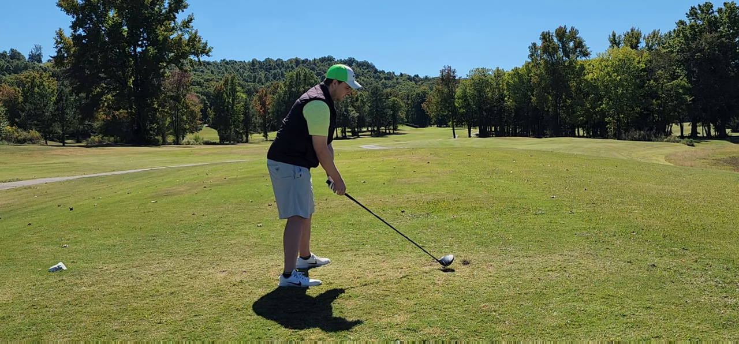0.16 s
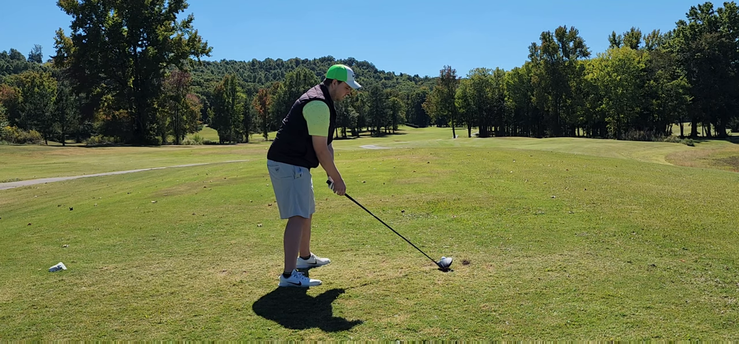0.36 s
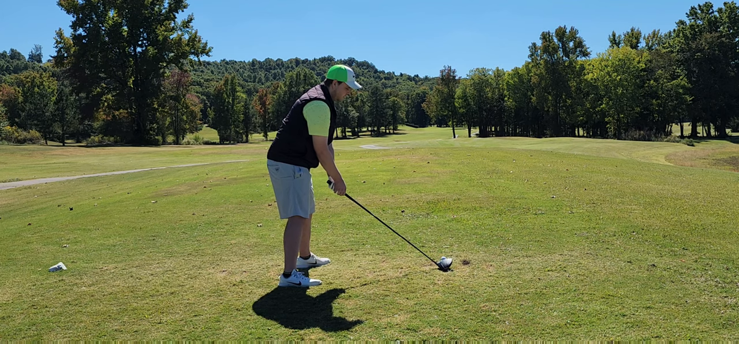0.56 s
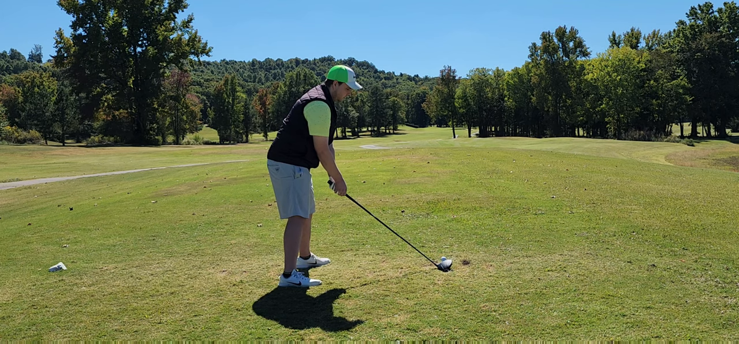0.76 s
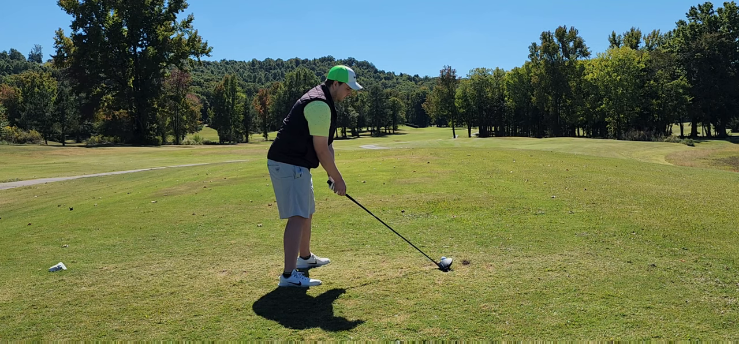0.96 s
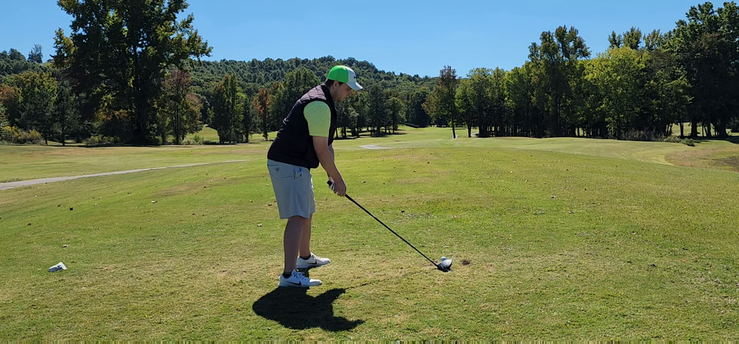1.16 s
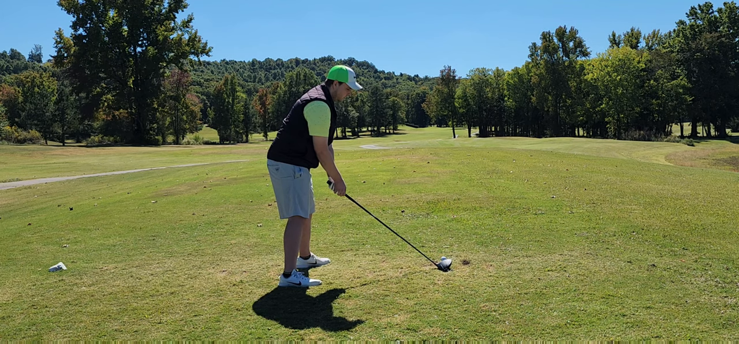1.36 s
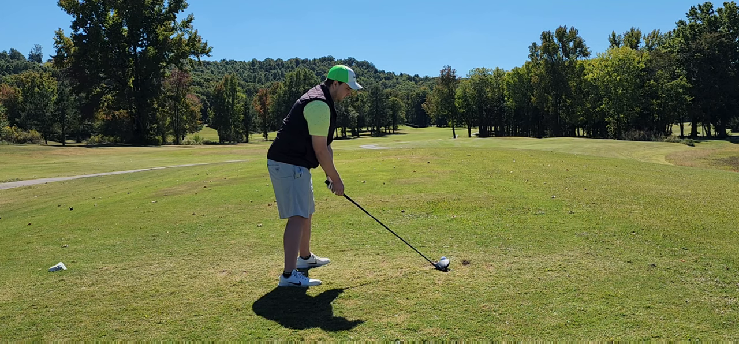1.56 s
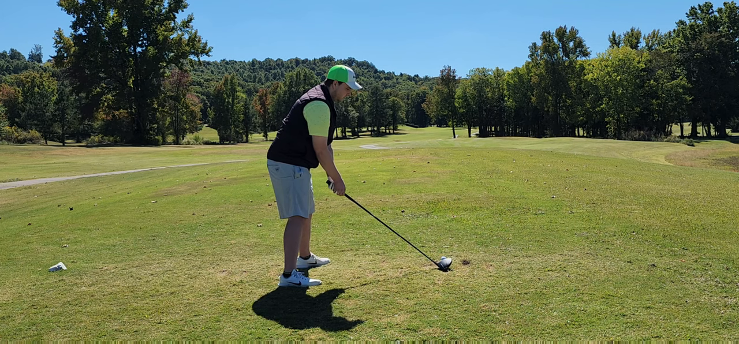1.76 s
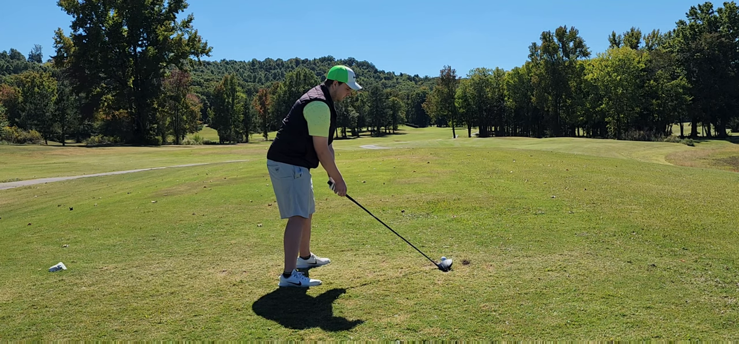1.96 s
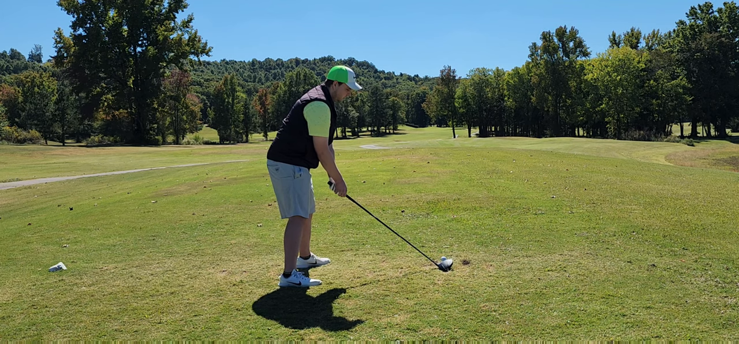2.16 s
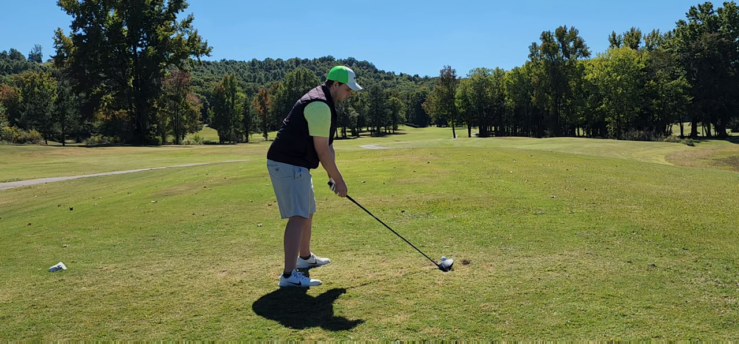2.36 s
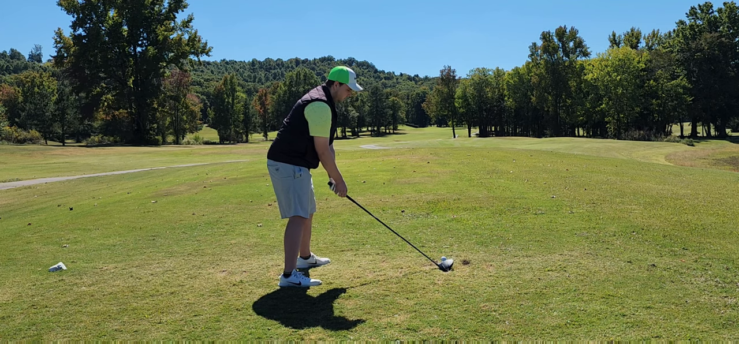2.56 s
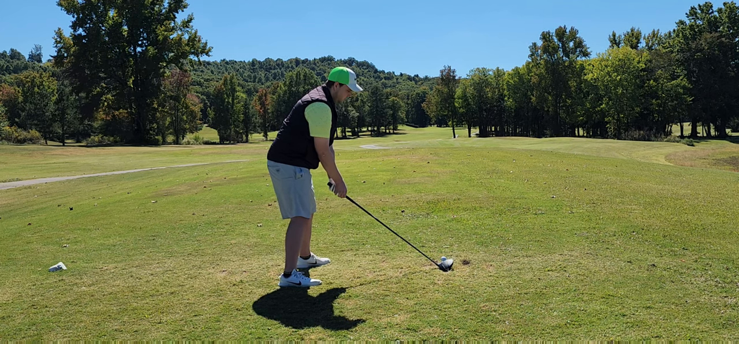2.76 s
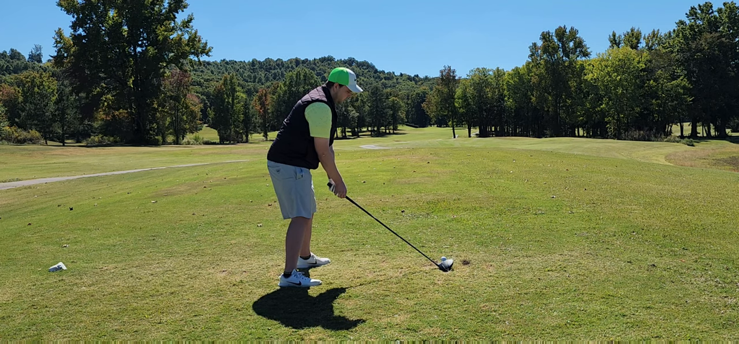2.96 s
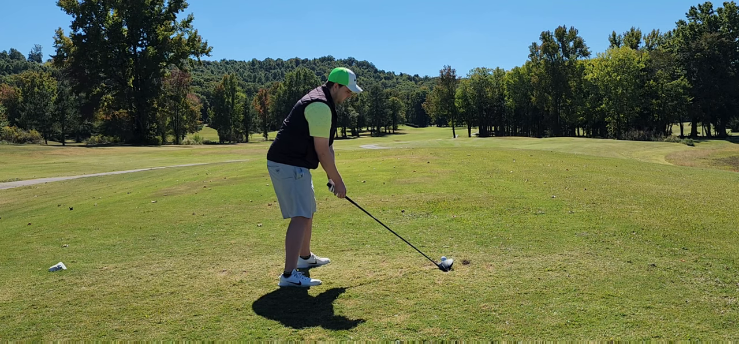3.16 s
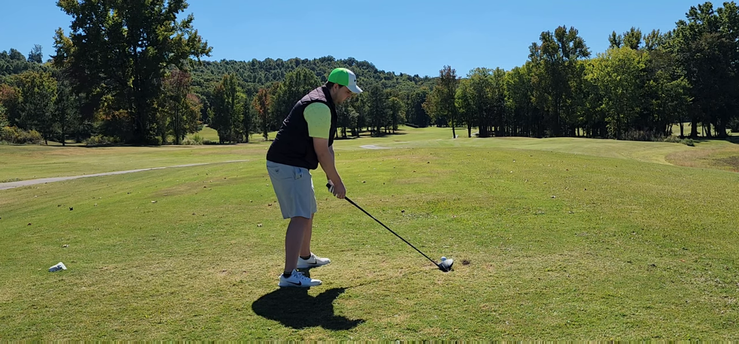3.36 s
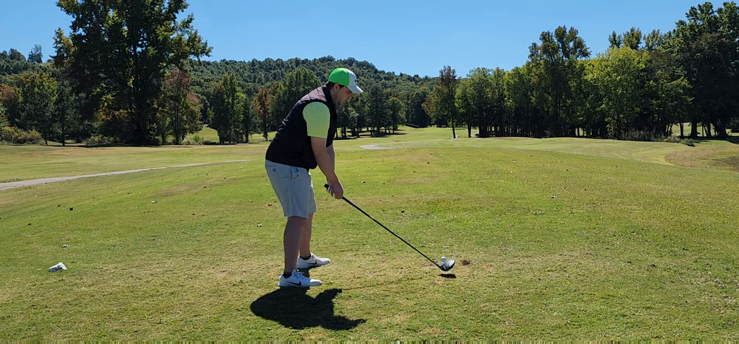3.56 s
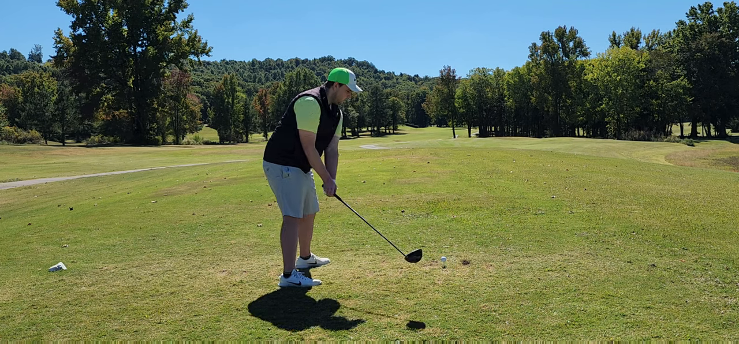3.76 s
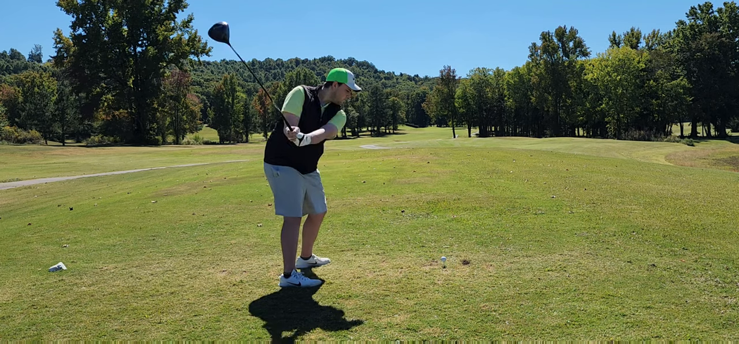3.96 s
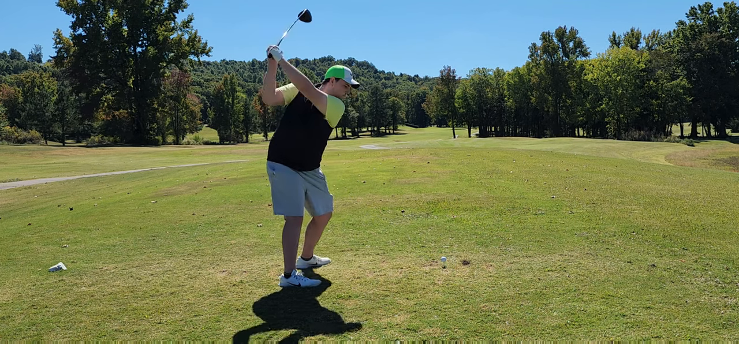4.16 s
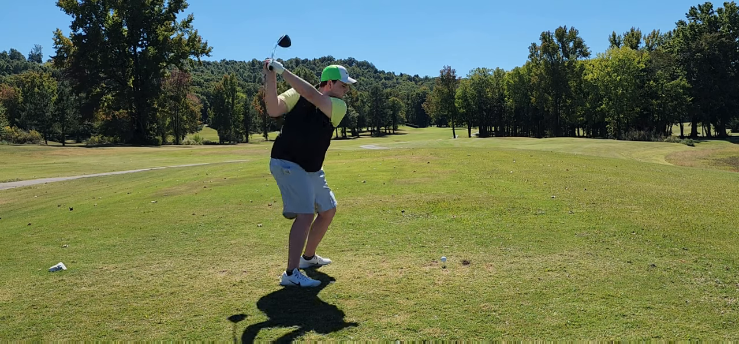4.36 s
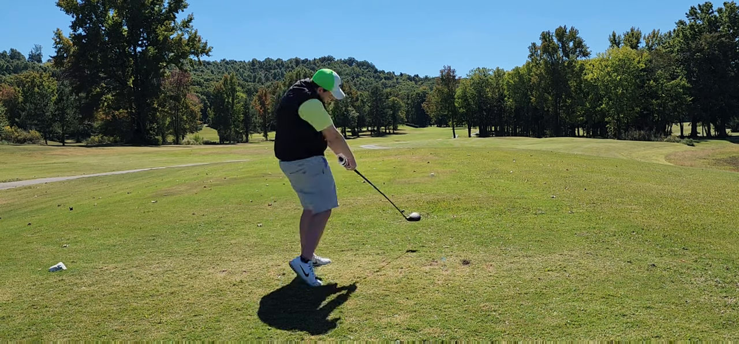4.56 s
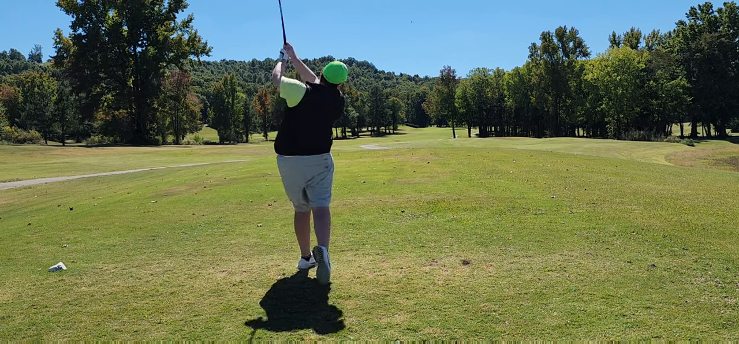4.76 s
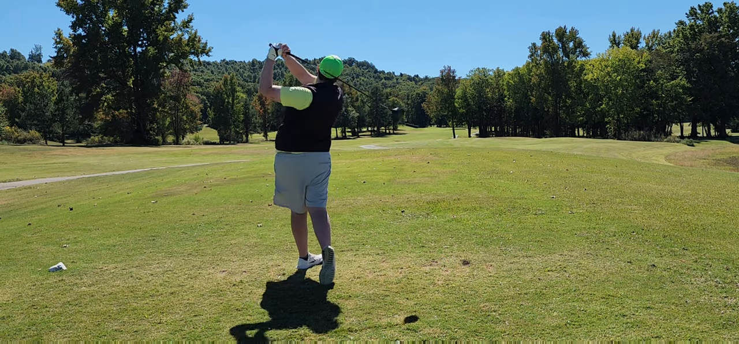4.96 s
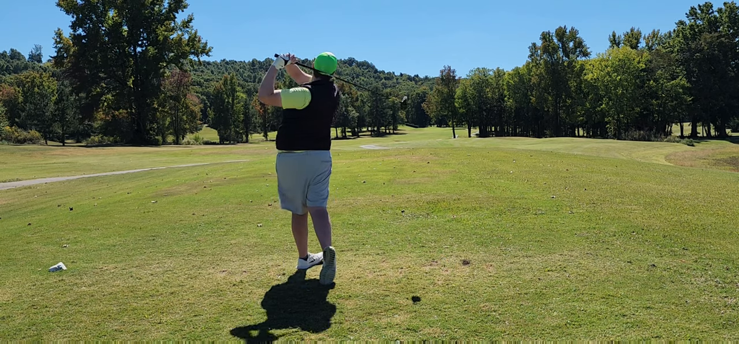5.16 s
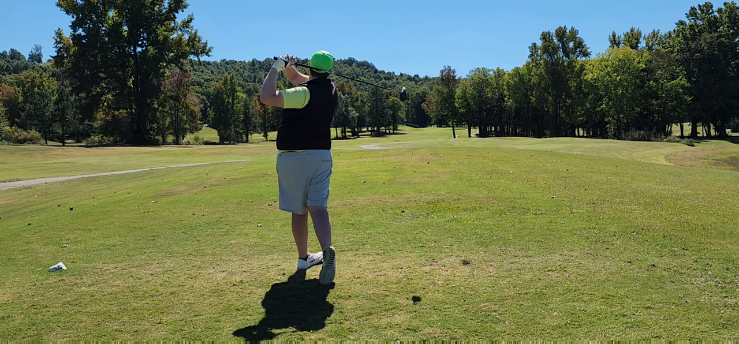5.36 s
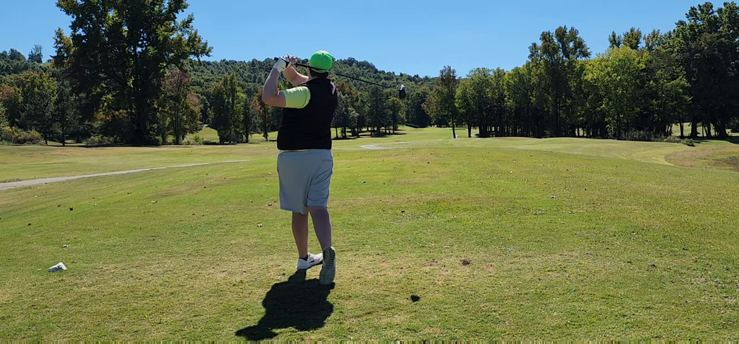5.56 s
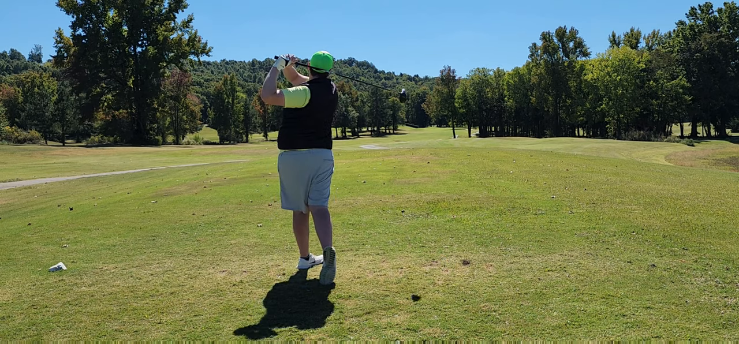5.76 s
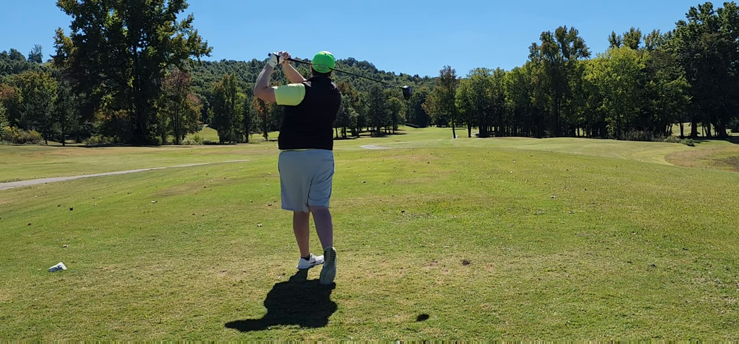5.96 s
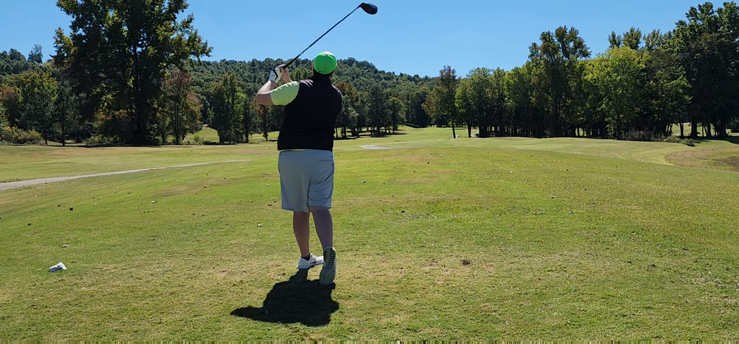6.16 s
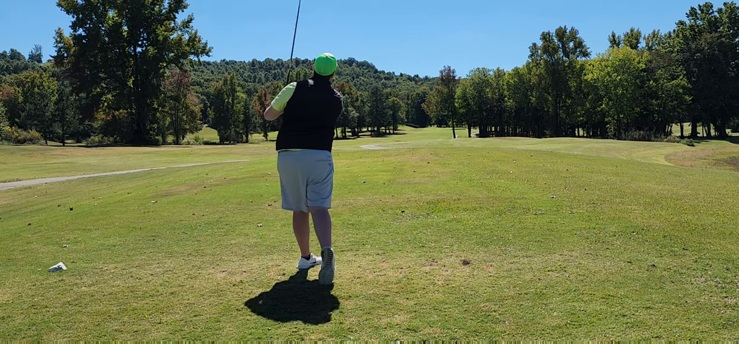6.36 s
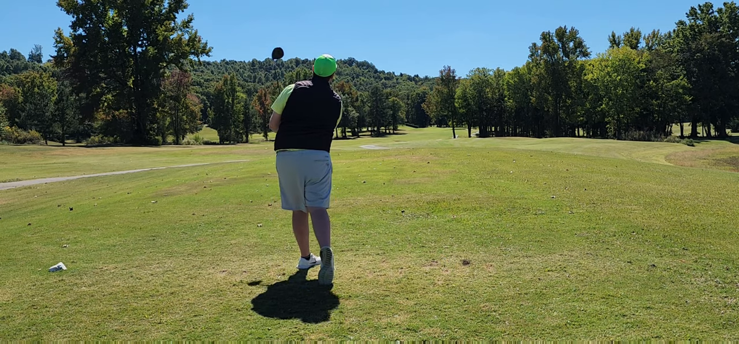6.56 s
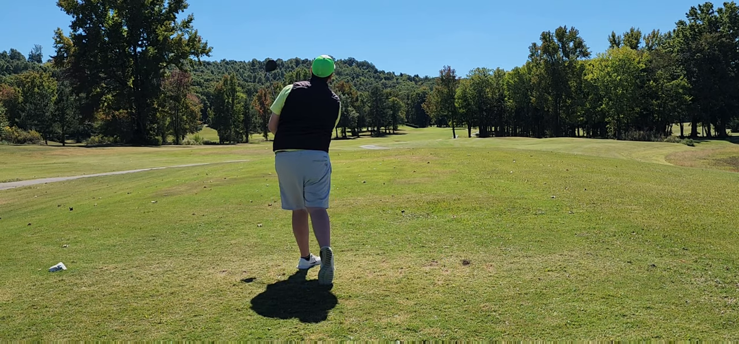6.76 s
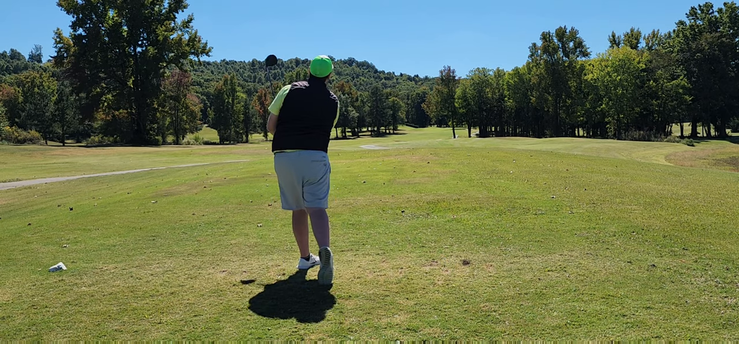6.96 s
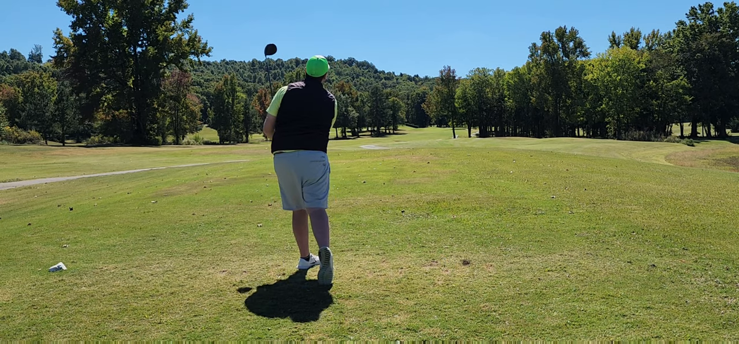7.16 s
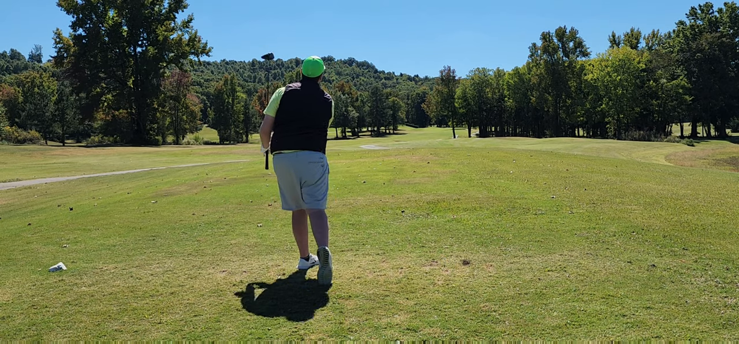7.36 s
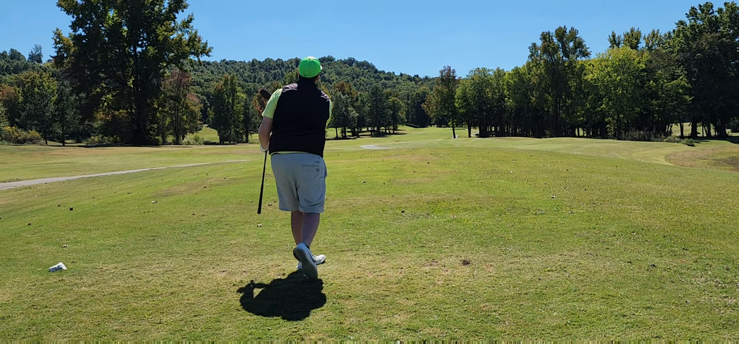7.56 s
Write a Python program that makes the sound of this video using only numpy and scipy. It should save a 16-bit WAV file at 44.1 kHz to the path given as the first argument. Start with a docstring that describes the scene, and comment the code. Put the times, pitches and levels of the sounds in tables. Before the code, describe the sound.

Wind softly buffets a stereo microphone a few metres from a golfer, while two far engines drone and leaves hiss gently. A few tiny scuffs pass unnoticed. Then comes a brief rising whoosh, a sharp metallic crack far louder than everything else, and a quick high ring gliding slightly upward. A leafy splash of echo follows at once, then weak smeared returns from far trees, and the calm hum continues, slightly lowered at first.

```python
"""A golfer drives a ball off the tee, a few metres from a microphone, on an open course.
From the start, sine tones make two distant mowers; filtered noise makes low wind, leaves and crickets.
Faint scuffs of noise come and go before and after the hit. At 4.4 s the shaft whistles: a gliding sine
with noise around it. The hollow metal head cracks and rings, as short bursts and fading sines that
glide up. Near trees splash the crack back as noise; far trees return the ring, smeared and repitched."""
import sys
import numpy as np
from scipy import signal
from scipy.fft import rfft, irfft
from scipy.io import wavfile
from scipy.ndimage import uniform_filter1d

SR = 44100
rng = np.random.default_rng(int(sys.argv[2]) if len(sys.argv) > 2 else 0)


def transcribe(signal):
    """Save signal, clipped to [-1, 1], as a 16-bit WAV file at the path in sys.argv[1]."""
    frames = np.atleast_2d(signal).T
    limited = np.clip(frames, -1, 1)
    pcm = np.round(limited * 32767).astype(np.int16)
    wavfile.write(sys.argv[1], SR, pcm)


N = 336042
TIME = np.arange(N) / SR  # seconds
IMPACT_S = 4.574
EDGE_HZ = 15600  # highest frequency let through

# Steady firing rates of the two far engines [f/Hz]
FIRING_HZ = (68.3, 48.5)
ENGINE_DB, ENGINE_DRIFT_HZ = -41, 0.12
# Engine tones [engine 0 or 1, multiple of the firing rate, level/dB relative to ENGINE_DB]
ENGINE_TONES = [(0, 1, 0), (0, 2, -8), (0, 2.6, -21), (0, 3, -26), (0, 3.33, -28), (0, 5, -41), (0, 8, -38),
                (0, 8.75, -36), (0, 9, -37), (0, 9.5, -39), (0, 10, -26), (0, 10.25, -34), (0, 10.5, -38),
                (0, 16.75, -38), (0, 29.75, -38), (0, 30.25, -38), (1, 1, -10), (1, 2, -4.5), (1, 2.7, -16)]
# Brief dips of the engines' bass hum [t/s, half length/s, level change/dB]
HUM_DIPS = [(3.5, 0.59, -1), (4.3, 0.16, -4.5), (4.67, 0.1, -20), (4.92, 0.068, -21)]
BLADE_HZ, BLADE_DB = 450, -78  # level between the swells
# The blades hum louder as the mower turns this way [t/s, half length/s, rise/dB]
BLADE_SWELLS = [(.6, 0.75, 8.5), (3.45, 0.47, 13), (4.05, 0.25, 7), (6.3, 1, 12.5), (7.2, 0.22, 8.5)]
RECEDE_DB_PER_S = 0.14  # a mower slowly moves away

# Colour of the wind on the microphone [f/Hz, level/dB per Hz]
WIND_COLOUR = [(10, -25), (25, -8.5), (45, 0.5), (80, 0.5), (115, -4.5), (150, -6), (185, -13.5),
               (230, -25.5), (300, -41), (500, -57.5), (2000, -89.5)]
BREEZE_DB = -45.5  # level between gusts
# Gusts over the steady breeze [t/s, half length/s, rise/dB]
WIND_GUSTS = [(1.85, 0.27, 4.1), (2.37, 0.26, 7.9), (2.56, 0.078, 6.4), (2.72, 0.039, 8.1),
              (2.969, 0.08, 5.6), (3.3, .15, 4.7), (4.07, 0.11, 4.3), (4.88, 0.069, 4.1), (7.3, 0.4, 3.5)]
# Gusts also buffet higher up, growing faster than the rumble (dB per dB)
BUFFET_DB, BUFFET_GROWTH = -79.5, 2.0

# Colours of the mower deck's drone, the leaves and the high hiss [f/Hz, level/dB per Hz]
DRONE_COLOUR = [(150, -30), (300, -11.5), (450, -8), (500, -7.5), (580, -2.5), (700, -2.5), (880, -4.5),
                (1000, -5), (1140, 0), (1260, -9.5), (1500, -13.5), (4000, -60)]
RUSTLE_COLOUR = [(400, -29), (950, -5.5), (1350, 0.5), (1650, -2), (2100, -3), (2800, -11.5), (4000, -22),
                 (9000, -53.5)]
HISS_COLOUR = [(800, -22), (2800, 0.5), (4600, -1), (6400, -5.5), (8300, -8.5), (10000, -23), (13000, -23),
               (16000, -24)]
DRONE_DB, RUSTLE_DB, HISS_DB = -60, -63, -67.5  # base levels
# Slow change in the drone's level [t/s, half length/s, level change/dB]
DRONE_CHANGES = [(1.5, .9, -0.5)]
# Breaths of wind swell in the leaves [t/s, half length/s, rise/dB]
LEAF_SWELLS = [(3.0, 0.61, 5), (3.95, 0.41, 3.4), (7.6, 0.75, 3.1)]
HISS_SHARE = 0.29  # part of each leaf swell, in dB, that the hiss follows
FLUTTER_DB = 1.8  # size of the patchy flicker
# Crickets [f/Hz, level/dB before wavering]
CRICKETS = [(4800, -88), (6270, -88.5)]

# Faint scuffs of shoes, clothes and grass [t/s, half length/s, centre f/Hz, level/dB]
SCUFFS = [(2.053, 0.021, 4340, -68), (2.623, 0.0018, 1750, -52.5), (3.985, 0.0018, 9400, -65),
          (4.063, 0.19, 10110, -83), (4.5712, 0.00076, 451, -36.5), (4.617, 0.0035, 482, -52),
          (6.88, 0.021, 7250, -83), (7.52, .15, 10500, -85)]

# Downswing [t/s, shaft whistle f/Hz, whoosh level/dB, head hiss level/dB]
SWING = [(4.41, 450, -68, -82), (4.455, 520, -58, -64), (4.475, 600, -52, -58.5),
         (4.488, 630, -49.5, -56.5), (4.501, 750, -36.5, -53.5), (4.513, 740, -41, -52.5),
         (4.525, 820, -40, -51.5), (4.552, 870, -40.5, -45), (4.567, 830, -44.5, -32.5),
         (4.582, 800, -67, -45), (4.63, 600, -80, -80)]
# Colours of the shaft's wake and of the head's hiss [f/Hz, level/dB per Hz]
WAKE_COLOUR = [(100, -4.5), (300, -3.5), (600, 5.0), (1100, -4.0), (1800, -18), (3600, -28), (9000, -55)]
HEAD_HISS_COLOUR = [(1000, -9.5), (2000, -1), (3200, 0), (5500, 3.5), (8000, 1.5), (10000, -7.5),
                    (15500, -5.0)]
# The upper whistles grow faster than the main one as the shaft speeds up
BRIGHTEN_DB_PER_HZ, BRIGHT_FROM_HZ = 0.05, 810
# Low puff of air pushed ahead of the head [t/s, half length/s, level/dB]
PUFF = (4.563, .011, -40.5)

# Crack of face and ball [f/Hz, peak level/dB, time to peak/s]
CRACK = [(1790, -20, 0.00025), (2530, -15.5, .00035), (3670, -14.5, 0.00065), (5282, -4, 0.00063),
         (7330, -15.5, 0.0019), (8400, -17.5, 0.0006), (13950, -20, 0.00063)]
# Ring of the club head [f/Hz at contact, relative level/dB, time to fall 60 dB/s, time to swell/s]
HEAD_MODES = [(1735, -52, .3, .04), (1873, -37, .19, .045), (2169, -43, .12, .012), (2800, -55, .25, .02),
              (3350, -40, .15, .002), (3413, -27.5, .175, .008), (3795, -20, .04, .001),
              (3870, -24.5, .095, .01), (3985, -20.5, .05, .001), (4115, -39, .15, .002),
              (4279, -30, .07, .002), (4581, -35, .11, .002), (4726, -38, .2, .002), (4830, -26, .05, .001),
              (5125, -21.5, .04, .001), (5278, -21.5, .125, .002), (5340, -33, .16, .002),
              (5427, -20, .055, .002), (5508, -28, .12, .002), (5552, -31, .11, .002),
              (5890, -11, .018, .0005), (5950, -38, .13, .004), (6015, -22, .095, .016),
              (6360, -35, .08, .002), (6650, -37, .07, .002), (6952, -27, .055, .002),
              (7160, -37, .11, .002), (7238, -37, .09, .002), (7380, -38, .12, .002),
              (7605, -31, .05, .002), (7760, -35, .06, .002), (7881, -39, .09, .002)]
# The shell's crowd of weak, short modes [f/Hz, level/dB per Hz]
SHELL_COLOUR = [(300, -35), (1500, -28), (3100, -14.5), (3800, -2.5), (4500, -8), (5500, -1), (6500, -9.5),
                (8300, -3), (10200, -12), (12200, -16.5), (13200, -13.5), (15500, -15)]
# Two near reflections of the hit [delay/s, level/dB]
REFLECTIONS = [(0.00663, -14), (0.0081, -23)]

# Colour of the near trees' splash [f/Hz, level/dB per Hz]
SPLASH_COLOUR = [(500, -26), (1500, -20), (2900, -9), (3500, -18), (3900, -3), (4700, -9), (6000, -1),
                 (6700, -0.5), (7400, -15), (8400, -7), (10000, -15), (15500, -21)]
# Near trees [delay/s, rise/s, time to fall 60 dB/s, level/dB, left over right level/dB]
NEAR_TREES = [(.08, 0.018, 0.24, -41, 4.5), (.104, 0.014, 0.15, -44, 1)]
# Far stands of trees [delay/s, rise/s, time to fall 60 dB/s, level/dB, pitch ratio,
#                      lowest f/Hz, highest f/Hz, left over right level/dB]
FAR_TREES = [(.375, 0.049, 0.46, -59.5, 1.155, 3900, 6200, -.5),
             (.485, .015, 0.13, -60, 1.1, 5400, 6400, -.5), (.497, .01, 0.13, -56, 1.0, 3600, 5500, 1),
             (.68, .03, .4, -68.5, 1.06, 5200, 6300, 2), (.755, .02, .2, -65, 0.73, 4870, 5600, 1)]

# Gain control: threshold, share of the excess taken off, time to turn down, recovery
AGC_THRESHOLD_DB, AGC_SHARE, AGC_ATTACK_S, AGC_RECOVERY_DB_PER_S = -25, 0.43, 0.36, 0.66


def gain_of(db):
    """Turns decibels into amplitude."""
    return 10 ** (np.asarray(db) / 20)


def evened(x):
    """Scales a sound to an rms (average strength) of 1."""
    return x / np.sqrt(np.mean(x ** 2) + 1e-20)


def curves(rows):
    """Draws each column of a timed table as a curve with a value at every sample."""
    times, *columns = np.transpose(rows)
    return [np.interp(TIME, times, column) for column in columns]


def swells(rows):
    """Adds up smooth rises and falls of level, in dB at every sample."""
    return sum(db * np.exp(-((TIME - s) / length) ** 2) for s, length, db in rows)


def wander(rate_hz):
    """Makes a smooth random curve of rms 1; a higher rate wanders faster."""
    hz = np.fft.rfftfreq(N, 1 / SR)
    return evened(irfft(rfft(rng.standard_normal(N)) * np.exp(-(hz / rate_hz) ** 2), N))


def noise(colour, same, left_lag_s=0):
    """Makes coloured stereo noise, partly shared by two microphone ports; the left may lag."""
    hz = np.fft.rfftfreq(N, 1 / SR)
    f, db = np.transpose(colour)
    shared = rfft(rng.standard_normal(N))
    own = rfft(rng.standard_normal((2, N)))
    shared = np.array([shared * np.exp(-2j * np.pi * hz * left_lag_s), shared])
    same = np.clip(same, 0, 1)
    mixed = np.sqrt(same) * shared + np.sqrt(1 - same) * own
    shape = gain_of(np.interp(np.log(hz + 1), np.log(f), db))
    return evened(irfft(mixed * shape, N))


def band(x, low_hz, high_hz):
    """Keeps the range between two frequencies, at rms 1."""
    edges = [low_hz, min(high_hz, EDGE_HZ)]
    return evened(signal.sosfilt(signal.butter(3, edges, "band", fs=SR, output="sos"), x))


def resonate(x, hz, width):
    """Lets through a narrow range that follows the curve hz, with gain 1 at its centre."""
    turn = np.exp(2j * np.pi * np.cumsum(hz) / SR)
    r = np.exp(-np.pi * width / SR)
    return 2 * (turn * signal.lfilter([1 - r], [1, -r], x / turn)).real


def resonant_noise(first_hz, second_hz, width):
    """Passes noise through two moving resonances in a row, at rms 1."""
    return evened(resonate(resonate(rng.standard_normal(N), first_hz, width), second_hz, width))


def pan(db):
    """Gives the gains of left and right for a level difference."""
    return gain_of([[db / 2], [-db / 2]])


def flutter(x):
    """Makes the level flicker at random in small patches of time and frequency."""
    z = signal.stft(x, nperseg=512, noverlap=384)[2]
    patches = rng.standard_normal(z.shape[1:])
    patches = uniform_filter1d(patches, size=5, axis=0)
    patches = evened(uniform_filter1d(patches, size=12, axis=1))
    flickering = z * gain_of(FLUTTER_DB * patches)
    return evened(signal.istft(flickering, nperseg=512, noverlap=384)[1][:, :N])


def mower():
    """Engine firing and spinning blades give wavering sine tones that reach the left port first."""
    port_lag_s = np.array([[0], [19]]) / SR
    turns = [np.cumsum(hz + ENGINE_DRIFT_HZ * wander(0.6)) / SR - hz * port_lag_s for hz in FIRING_HZ]
    dip_db, tones = swells(HUM_DIPS), 0
    for engine, multiple, db in ENGINE_TONES:
        drift = 0.014 * min(multiple, 8) * wander(12) + rng.random()  # in cycles
        bass = multiple * FIRING_HZ[engine] < 300
        change_db = dip_db if bass else 0.5 - RECEDE_DB_PER_S * TIME
        level = gain_of(db + change_db + wander(4.6))
        tones += level * np.sin(2 * np.pi * (multiple * turns[engine] + drift))
    blade_level = gain_of(BLADE_DB + swells(BLADE_SWELLS) + 2 * wander(8))
    blade_cycles = BLADE_HZ * (TIME - port_lag_s) + 0.22 * wander(14)
    blades = blade_level * np.sin(2 * np.pi * blade_cycles)
    return np.sqrt(2) * gain_of(ENGINE_DB) * tones * pan(-0.52) + blades


def wind():
    """Moving air rumbles unevenly at the two ports; gusts make it louder and brighter."""
    gust_db = swells(WIND_GUSTS) + wander(9.5)
    rumble = gain_of(BREEZE_DB + gust_db) * noise(WIND_COLOUR, 0.76)
    buffet_level = gain_of(BUFFET_DB + BUFFET_GROWTH * gust_db)
    buffet = buffet_level * band(rng.standard_normal((2, N)), 200.0, 280)
    return (rumble + buffet) * pan(-2)


def air():
    """A receding mower deck drones on the left, leaves rustle, and a thin hiss spreads all round."""
    swell_db = swells(LEAF_SWELLS)
    left_lag_s = -20 / SR  # negative: the left port hears it first
    drone_db = DRONE_DB + swells(DRONE_CHANGES) - RECEDE_DB_PER_S * TIME + 0.5 * wander(2.1)
    drone = gain_of(drone_db) * noise(DRONE_COLOUR, 0.98, left_lag_s) * pan(2.0)
    rustle_level = gain_of(RUSTLE_DB + swell_db + 0.18 * wander(15))
    rustle = rustle_level * flutter(noise(RUSTLE_COLOUR, 0.57, left_lag_s)) * pan(1.5)
    hiss_level = gain_of(HISS_DB + HISS_SHARE * swell_db)
    hiss = hiss_level * flutter(noise(HISS_COLOUR, 0.06, left_lag_s)) * pan(2.9)
    return drone + rustle + hiss


def crickets():
    """Crickets far off in the grass give thin, uneven tones: noise squeezed into narrow bands."""
    out = 0
    for hz, db in CRICKETS:
        steady_hz = np.full(N, hz)
        out += gain_of(db + 3.5 * wander(9)) * resonant_noise(steady_hz, steady_hz, 70)
    return out


def scuffs():
    """Friction makes brief soft puffs of noise, each an octave wide, before, at and after the hit."""
    out = 0
    for s, length, hz, db in SCUFFS:
        friction = band(rng.standard_normal(N), hz / np.sqrt(2), hz * np.sqrt(2))
        out += gain_of(db) * np.exp(-((TIME - s) / length) ** 2) * friction
    return out


def swing():
    """Swirls of air shed by the shaft whistle higher with speed; the head tears and pushes the air."""
    hz, whoosh_db, hiss_db = curves(SWING)
    phase = 2 * np.pi * np.cumsum(hz * (1 + 0.05 * wander(160))) / SR
    vortex = gain_of(1.6 * wander(120)) * np.sin(phase)
    overtone = resonant_noise(2.0 * hz, 1.9 * hz, 200)
    eddies = gain_of(2.5 * wander(200)) * resonant_noise(2.4 * hz, 2.6 * hz, 600)
    upper = gain_of(-7.5) * overtone + gain_of(-12.0) * eddies
    upper *= gain_of(BRIGHTEN_DB_PER_HZ * (hz - BRIGHT_FROM_HZ))
    wake = noise(WAKE_COLOUR, 0.79)
    whoosh = gain_of(-0.2) * vortex + upper + gain_of(-2.5) * wake
    hiss = gain_of(1.2 * wander(200)) * noise(HEAD_HISS_COLOUR, 0.66)
    puff = gain_of(PUFF[2]) * np.exp(-((TIME - PUFF[0]) / PUFF[1]) ** 2)
    puff = puff * band(rng.standard_normal(N), 140, 240)
    moving = (TIME > SWING[0][0]) & (TIME < SWING[-1][0])
    return moving * (gain_of(whoosh_db) * whoosh + gain_of(hiss_db) * hiss) + puff


def club(t, head_speed=30, arc_rate=15):
    """Push, crack and ring t s after contact; the head (m/s) curves up (rad/s), so its ring glides up."""
    receding = head_speed / 343  # share of the speed of sound
    doppler = (1 + receding) / (1 + receding * np.cos(np.minimum(arc_rate * t, np.pi)))
    ring_time = np.cumsum(doppler * (t > 0), axis=-1) / SR
    ring = 0
    for hz, db, t60, swell in HEAD_MODES:
        take_up = 1 - np.exp(-(t / swell) ** 2)
        beam_db = 2 * wander(60)[:t.shape[-1]]  # the turning head sweeps each mode's beam past
        level = take_up * gain_of(db - 60 * t / t60 + beam_db)
        ring += level * np.sin(2 * np.pi * hz * ring_time)
    crack = 0
    for hz, db, rise in CRACK:
        burst = (t / rise * np.exp(1 - t / rise)) ** 2
        crack += gain_of(db) * burst * np.sin(2 * np.pi * hz * t)
    u = t / 0.0003
    push = gain_of(-7.5) * (1 - u) * np.exp(-u) * (1 - np.exp(-t / 0.00004))
    return push + crack + gain_of(1.0) * ring


def strike():
    """The hit reaches both ports with a clatter of many shell modes and two near reflections."""
    port_lag_s = np.array([[2], [0]]) / SR
    start, direct = round(IMPACT_S * SR), np.zeros((2, N))
    direct[:, start:start + SR] = club(np.maximum(TIME[:SR] - port_lag_s, 0))
    t = np.maximum(TIME - IMPACT_S, 0)
    clatter = noise(SHELL_COLOUR, 0.29)
    shell = gain_of(-20.0 - 60 * t / 0.04) * clatter
    shell += gain_of(-42.0 - 60 * t / 0.4) * band(clatter, 1700, 7500)
    shell += gain_of(-37.5 - 60 * t / 0.12) * band(clatter, 7100, 16000)
    shell *= 1 - np.exp(-t / 0.00057)
    bright = signal.sosfilt(signal.butter(4, 3000, "high", fs=SR, output="sos"), direct)
    near = sum(gain_of(db) * np.roll(bright, round(s * SR), axis=1) for s, db in REFLECTIONS)
    return direct + shell + near


def echo_level(delay, rise, t60, db):
    """An echo swells as the sound enters the foliage, then dies away unevenly."""
    age = np.maximum(TIME - IMPACT_S - delay, 0)
    fall_db = 60 * np.maximum(age - rise, 0) / t60
    return np.minimum(age / rise, 1) * gain_of(db - fall_db + 1.3 * wander(70))


def near_trees():
    """Countless leaves smear the crack into a grainy splash of noise."""
    out = 0
    for *shape, side_db in NEAR_TREES:
        out += echo_level(*shape) * flutter(noise(SPLASH_COLOUR, 0.12)) * pan(side_db)
    return out


def far_trees(hit):
    """Far stands return the ring, higher in pitch where the head was flying toward them."""
    out = np.zeros((2, N))
    ring = hit.mean(0)[round(IMPACT_S * SR):][:SR // 4]
    ring = ring * (1 - np.exp(-TIME[:SR // 4] / 0.004))  # softens the first crack
    for *shape, pitch, low_hz, high_hz, side_db in FAR_TREES:
        shifted = band(signal.resample(ring, round(len(ring) / pitch)), low_hz, high_hz)
        shifted = shifted[None] / np.linalg.norm(shifted)
        scatter = echo_level(*shape) * rng.standard_normal((2, N))
        echo = signal.oaconvolve(scatter, shifted, axes=1)
        out += echo[:, :N] * pan(side_db)
    return out


def scene():
    """Mixes the drive and its echoes with the sounds of the course."""
    course = mower() + wind() + air() + crickets()
    hit = strike()
    return course + scuffs() + swing() + hit + near_trees() + far_trees(hit)


def record(dry):
    """Clips peaks, turns the level down when loud, recovers slowly, then cuts the highest treble."""
    held = np.clip(dry, -0.9, 0.9)
    power = abs(uniform_filter1d((held ** 2).mean(0), size=441))
    power_db = 10 * np.log10(power + 1e-12)
    excess_db = np.maximum(power_db - AGC_THRESHOLD_DB, 0)
    recovery = AGC_RECOVERY_DB_PER_S * TIME
    # the running maximum holds each cut, which then shrinks at the recovery rate
    cut_db = np.maximum.accumulate(AGC_SHARE * excess_db + recovery) - recovery
    ease = np.hanning(round(AGC_ATTACK_S * SR))
    ducked = held * gain_of(-signal.oaconvolve(cut_db, ease / ease.sum())[:N])
    low_pass = signal.firwin(255, EDGE_HZ, window=("kaiser", 9), fs=SR)
    return signal.oaconvolve(ducked, low_pass[None], "same")


dry = scene()
out = record(dry)
transcribe(out)
```